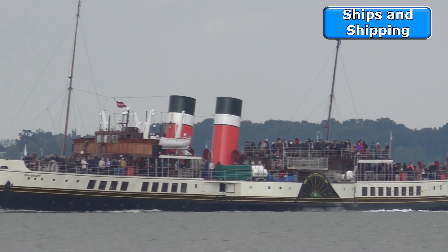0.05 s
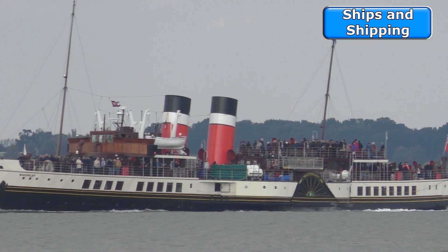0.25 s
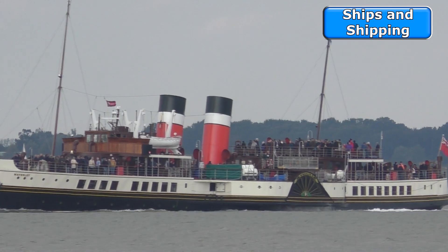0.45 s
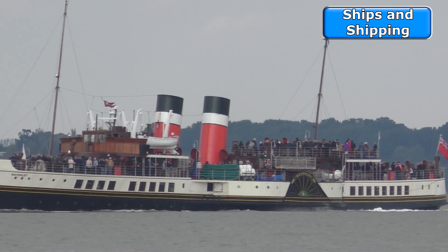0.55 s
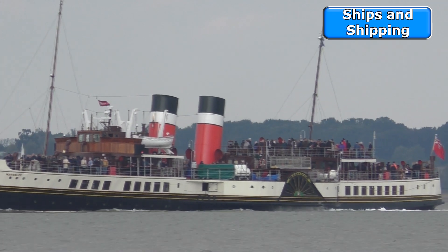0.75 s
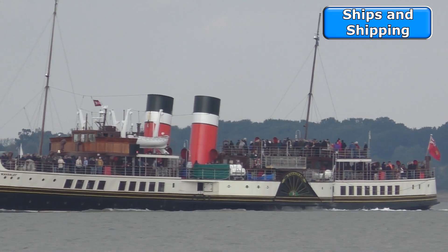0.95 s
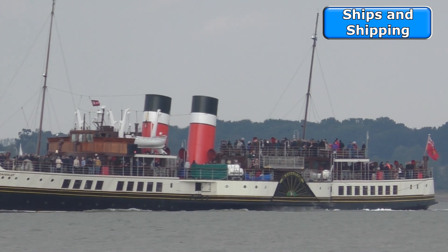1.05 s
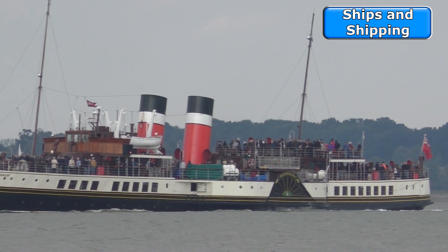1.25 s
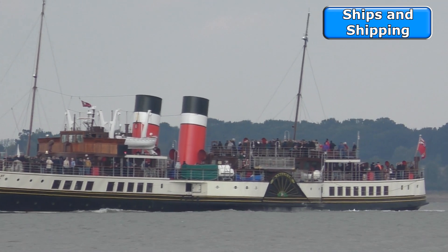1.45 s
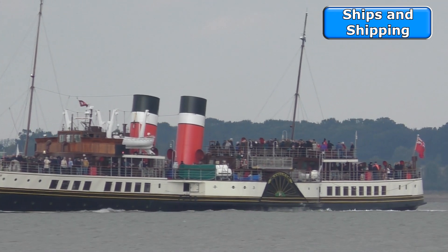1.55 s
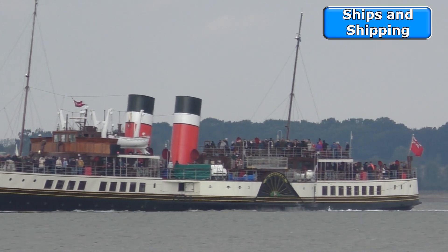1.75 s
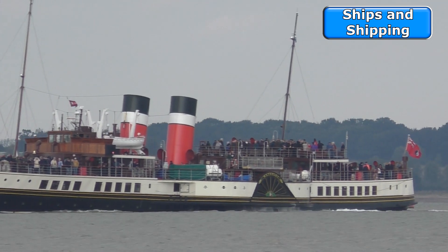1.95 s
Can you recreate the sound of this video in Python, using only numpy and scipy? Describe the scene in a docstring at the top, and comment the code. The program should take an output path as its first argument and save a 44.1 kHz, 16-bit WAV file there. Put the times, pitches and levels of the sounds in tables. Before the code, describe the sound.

Small waves wash quietly on an open shore, with low slosh, bubbling spill and fine foamy hiss throughout. From about 0.2 to 0.5 s a strong gust buffets the microphone in deep, fluttering thumps, much louder than the water. A drip and low glug come near 0.6 s, a little wavelet breaks close by at 1.07 s, another glug at 1.23 s, then short wind puffs at 1.5 and 1.75 s.

```python
"""Small waves on a windy shore

Small waves wash on an open shore: low slosh, spill, wash and foam are noise with ringing bubbles on top.
Eddies of wind thump softly on the microphone as short pulses, over a flutter of low noise,
in one long gust and a few short puffs. Droplets fall back as bright bursts of noise, air pockets
ring as decaying tones, and close by a wavelet breaks with a quick swell of noise and bubbles."""
import sys
import numpy as np
from scipy.fft import rfft, irfft, next_fast_len
from scipy.io import wavfile
from scipy.ndimage import map_coordinates

SR = 44100
rng = np.random.default_rng(int(sys.argv[2]) if len(sys.argv) > 2 else 0)


def to_wav(s):
    """Save 16-bit WAV."""
    ch = np.atleast_2d(s).T  # columns
    pcm = np.round(np.clip(ch, -1, 1) * 32767)  # PCM
    wavfile.write(sys.argv[1], SR, pcm.astype(np.int16))


N = 88200  # two seconds of samples


def amp(db):
    """Decibels to gain."""
    return 10 ** (np.asarray(db) / 20)


def unit(x):
    """Scale a signal to rms 1."""
    return x / np.sqrt(np.mean(x ** 2) + 1e-20)


def curve(rows):
    """Draw straight lines through (time [s], value) points, one value per sample."""
    return np.interp(np.arange(N) / SR, *np.transpose(rows))


def wobble(rate):
    """A smooth random curve through `rate` random points a second."""
    points = rng.standard_normal(1000)
    position = np.arange(N) * rate / SR + 3
    return map_coordinates(points, [position], mode="wrap")


def filtered(x, response):
    """Multiply the spectrum of x by a response of frequency."""
    m = next_fast_len(N + SR // 2)  # padded with silence
    spectrum = rfft(x, m) * response(np.fft.rfftfreq(m, 1 / SR))
    return irfft(spectrum, m)[:N]


def coloured(x, points):
    """Shape x by (frequency [Hz], gain [dB]) points on a log frequency axis."""
    f, db = np.transpose(points)
    return filtered(x, lambda hz: amp(np.interp(np.log(hz + 1), np.log(f), db)))


def bubbles(count, low_hz, high_hz, cycles, spread_db):
    """A cloud of small ringing bubbles of uneven size, each rising a little in pitch; rms 1."""
    when, pitch, size = rng.random((count, 3)).T[:, :, None]
    hz = low_hz + (high_hz - low_hz) * pitch
    k = np.arange(int(min(4 * cycles / low_hz, .05) * SR))
    age = hz * k / SR / cycles  # in decay times, each `cycles` periods long
    tone = np.sin(2 * np.pi * cycles * age * (1 + 0.025 * age))
    ring = tone * np.exp(-age) * (1 - np.exp(-10 * age))
    gain = amp(-spread_db * np.log(1 - .95 * size)) * np.sqrt(hz)  # many faint, few loud
    sample = (when * N).astype(int) + k
    return unit(np.bincount(sample.ravel(), (gain * ring).ravel(), N)[:N])


def water(colour, grains, grain_db):
    """Countless merged bubbles as noise, with nearer single ones on top; rms 1."""
    merged = unit(coloured(rng.standard_normal(N), colour))
    single = unit(coloured(grains, colour))
    return unit(merged + amp(grain_db) * single)


# Levels of the water's layers along the shore, before any gain below: (time [s], level [dB])
SLOSH_LEVEL = [(0, -65), (.17, -62), (.36, -76), (.5, -59), (.6, -54), (.7, -53), (.8, -59), (1.0, -58.5),
               (1.18, -60), (1.26, -53.5), (1.33, -63), (1.6, -65), (1.67, -57.5), (1.78, -58.5),
               (1.88, -66.5), (2, -59.5)]
SPILL_LEVEL = [(0, -60.5), (.17, -68), (.45, -57), (.62, -57), (.74, -62), (.93, -63), (.99, -53.5),
               (1.13, -53.5), (1.28, -53.5), (1.33, -59.5), (1.58, -62), (1.66, -73), (1.8, -65),
               (2, -64.5)]
WASH_LEVEL = [(0, -56.5), (.08, -59.5), (.21, -60), (.25, -56), (.59, -55), (.76, -58), (.92, -63),
              (1.02, -61), (1.1, -62), (1.28, -61.5), (1.5, -61), (1.64, -66.5), (1.86, -63.5), (2, -60.5)]
FOAM_LEVEL = [(0, -66.5), (.17, -65.5), (.24, -59.5), (.3, -59), (.38, -61), (.53, -59), (.595, -55.5),
              (.66, -57.5), (.8, -62), (.87, -58.5), (1.06, -59), (1.11, -61.5), (1.25, -60), (1.33, -64.5),
              (1.55, -64), (1.68, -65), (1.76, -63.5), (2, -62)]
# Their colours, as relative spectra: (frequency [Hz], level [dB])
SLOSH_SPECTRUM = [(100, -11), (200, -5.5), (285, -3), (380, -6), (480, -11.5), (640, -17), (850, -17),
                  (2000, -46)]
SPILL_SPECTRUM = [(300, -32), (550, -4.5), (800, -13), (1020, -1.5), (1280, 2.5), (1550, -4), (1900, -8.5),
                  (3000, -65), (8000, -79)]
WASH_SPECTRUM = [(700, -64), (1300, -5.5), (1900, 1), (2500, 2), (3200, 2.5), (3900, -1), (4700, -8),
                 (5600, -14.5), (6700, -24.5), (9000, -26), (16000, -60)]
FOAM_SPECTRUM = [(2500, -36), (4800, -5.5), (6000, -8), (6900, -8), (8000, -2), (9800, 2), (12000, -1),
                 (13500, -4), (15500, -9.5)]
# The wash leans to smaller bubbles when positive, to larger when negative: (time [s], tilt [dB])
WASH_TILT = [(0, -2), (.3, -.6), (.7, 0.5), (1.0, -0.5), (1.4, 3), (1.66, -0.5), (2, -1)]
WASH_SPLIT_HZ = 2900  # between large and small bubbles
SPILL_DB, FOAM_DB = -1.5, -1  # gains


def waves():
    """Low slosh, bubbling spill, wash up the shore and fizzing foam: ever smaller, higher bubbles."""
    grains = bubbles(count=260, low_hz=194.6, high_hz=669, cycles=1.43, spread_db=3)
    slosh = water(SLOSH_SPECTRUM, grains, grain_db=0)
    grains = bubbles(count=1200, low_hz=585, high_hz=2253, cycles=6.1, spread_db=3)
    spill = water(SPILL_SPECTRUM, grains, grain_db=-0.5)
    grains = bubbles(count=3000, low_hz=1393, high_hz=6230, cycles=4.55, spread_db=3)
    wash = water(WASH_SPECTRUM, grains, grain_db=-2)
    grains = bubbles(count=3000, low_hz=4820, high_hz=14600, cycles=4.1, spread_db=4.5)
    foam = water(FOAM_SPECTRUM, grains, grain_db=-2)

    coarse = filtered(wash, lambda hz: 1 / (1 + (hz / WASH_SPLIT_HZ) ** 6))
    fine = wash - coarse
    tilt = curve(WASH_TILT)
    wash = amp(-tilt) * coarse + amp(tilt) * fine

    # wash and foam also flicker at random
    wash_db = curve(WASH_LEVEL) + 0.22 * wobble(70.5)
    foam_db = curve(FOAM_LEVEL) + FOAM_DB + 1.1 * wobble(80)
    low = amp(curve(SLOSH_LEVEL)) * slosh + amp(curve(SPILL_LEVEL) + SPILL_DB) * spill
    return low + amp(wash_db) * wash + amp(foam_db) * foam


# Eddies that hit the microphone, before EDDY_DB: (time [s], level [dB], pitch [Hz])
EDDY_HITS = [(0.201, -31.5, 118), (0.22, -27, 207), (0.245, -24.5, 150), (0.266, -32, 190),
             (0.295, -28.5, 215), (0.312, -23, 172), (0.348, -28, 167), (.36, -26.5, 135),
             (0.376, -34.5, 152), (.397, -24, 107), (0.425, -32, 145), (0.447, -23.5, 163),
             (.466, -30, 180), (0.494, -30.5, 137), (0.507, -32.5, 150), (.841, -42.5, 119),
             (0.875, -49.5, 120), (1.462, -38, 153), (1.482, -25, 165), (1.5, -28.5, 130),
             (1.737, -34, 165), (1.768, -40.5, 133), (1.883, -46, 129)]
# Low flutter of the wind at the microphone: (time [s], level [dB])
FLUTTER_LEVEL = [(0, -67.5), (.15, -57.5), (.24, -40), (.47, -38.5), (.54, -49), (.72, -66.5), (.8, -56),
                 (.86, -49), (.93, -62.5), (1.01, -52.5), (1.09, -63.5), (1.17, -54.5), (1.33, -66.5),
                 (1.43, -73), (1.5, -52.5), (1.63, -65), (1.78, -47.5), (1.84, -61), (2, -56)]
# Its colour, as a relative spectrum: (frequency [Hz], level [dB])
FLUTTER_SPECTRUM = [(15, -60), (30, -32), (60, -4.5), (105, -1.5), (190, -5), (280, -12), (420, -41),
                    (900, -70)]
EDDY_CYCLES, EDDY_DB = 0.6, 0.4  # half width of a thump in its own cycles; gain
SHOVE_HZ, SHOVE_S, SHOVE_DB = 41.2, 0.0067, -14  # deep push of air: pitch, half width, level re thump


def wind():
    """Each eddy pushes the diaphragm to and fro once or twice, over an uneven flutter."""
    t = np.arange(N) / SR
    thumps = np.zeros(N)
    for s, db, hz in EDDY_HITS:
        turns = (t - s) * hz
        thump = np.exp(-.5 * (turns / EDDY_CYCLES) ** 2) * np.sin(2 * np.pi * (turns + rng.random()))
        swing = np.sin(2 * np.pi * ((t - s) * SHOVE_HZ + rng.random()))
        shove = np.exp(-.5 * ((t - s) / SHOVE_S) ** 2) * swing
        thumps += amp(db + EDDY_DB) * (thump + amp(SHOVE_DB) * shove)
    uneven_noise = rng.standard_normal(N) * amp(3.2 * wobble(34.8))
    flutter = unit(coloured(uneven_noise, FLUTTER_SPECTRUM))
    return thumps + amp(curve(FLUTTER_LEVEL)) * flutter


# Droplets falling back, before DROP_DB: (time [s], level [dB])
DROP_FALLS = [(.283, -51), (0.599, -45), (1.069, -47.5), (1.154, -50), (1.373, -57), (1.455, -55),
              (1.751, -53), (1.969, -53)]
# Their colour, as a relative spectrum: (frequency [Hz], level [dB])
DROP_SPECTRUM = [(800, -14), (2200, -29), (4000, -3.5), (6700, -34.5), (10000, -3), (15500, -22)]
DROP_DECAY_S, DROP_DB = 0.004, -1.5  # time to fall to 1/e; gain


def droplets():
    """Each drop is a short bright splat: noise that starts at once and dies away."""
    t = np.arange(N) / SR
    level = np.zeros(N)
    for s, db in DROP_FALLS:
        level += amp(db + DROP_DB) * (t >= s) * np.exp(-np.abs(t - s) / DROP_DECAY_S)
    return level * unit(coloured(rng.standard_normal(N), DROP_SPECTRUM))


# Air pockets closing in the water: (time [s], level [dB], starting pitch [Hz])
AIR_POCKETS = [(.594, -41, 280), (1.231, -38.5, 270), (1.1, -41, 2500), (1.146, -45, 1320)]
GLUG_CYCLES = 2.9  # decay time in cycles of the starting pitch


def glugs():
    """Single air pockets ring briefly, rising a little in pitch as they decay."""
    t = np.arange(N) / SR
    out = np.zeros(N)
    for s, db, hz in AIR_POCKETS:
        age = np.maximum(t - s, 0) * hz / GLUG_CYCLES  # in decay times
        tone = np.sin(2 * np.pi * GLUG_CYCLES * age * (1 + 0.013 * age))
        out += amp(db) * tone * np.exp(-age) * (1 - np.exp(-6 * age))
    return out


# Colour of the wavelet that breaks close by, as a relative spectrum: (frequency [Hz], level [dB])
BREAK_SPECTRUM = [(300, -8), (650, 4.5), (1300, -9), (1900, 2.5), (2800, 1), (4200, -3.5), (5400, -5.5),
                  (7000, -15), (12000, -23)]
BREAK_S, BREAK_RISE_S = 1.069, 0.032  # time of its peak; length of the rise before it
BREAK_DB, BREAK_FALL_DB_PER_S = -53.5, 44  # level at the peak; fall after it


def breaker():
    """A wavelet tips over quickly and bubbles away."""
    t = np.arange(N) / SR - BREAK_S
    rise = np.clip(1 + t / BREAK_RISE_S, 0, 1)
    fall = amp(BREAK_DB - BREAK_FALL_DB_PER_S * np.maximum(t, 0))
    grains = bubbles(count=1400, low_hz=692, high_hz=7160, cycles=5.3, spread_db=5)
    return rise * fall * water(BREAK_SPECTRUM, grains, grain_db=4.5)


def scene():
    """Water and wind at one microphone in the open."""
    return (waves() + wind() + droplets() + glugs() + breaker())[None]


LOW_CUT_HZ, TOP_HZ = 47, 15660  # bass roll-off; upper band limit


def record(dry):
    """The recorder thins the deepest bass and keeps nothing above its band limit."""
    def response(hz):
        bass_cut = hz ** 2 / np.hypot(hz ** 2, LOW_CUT_HZ ** 2)
        return (hz < TOP_HZ) * bass_cut
    return filtered(dry[0], response)[None]


dry = scene()
out = record(dry)
to_wav(out)
```